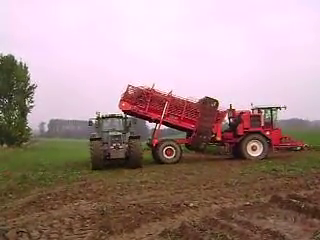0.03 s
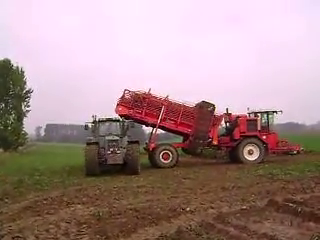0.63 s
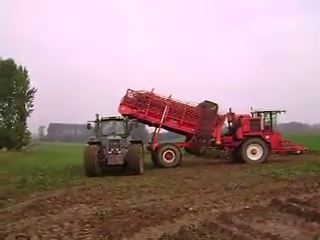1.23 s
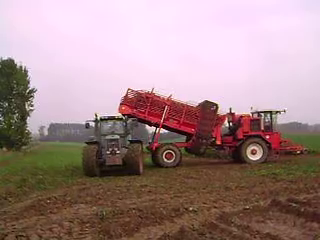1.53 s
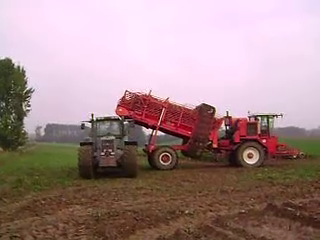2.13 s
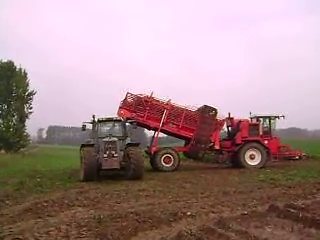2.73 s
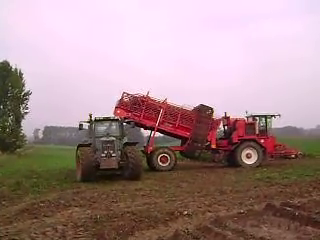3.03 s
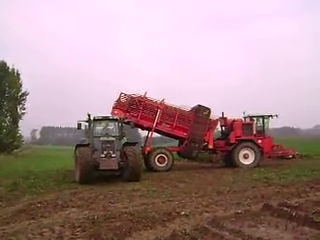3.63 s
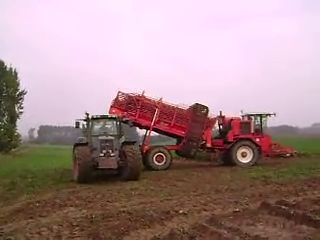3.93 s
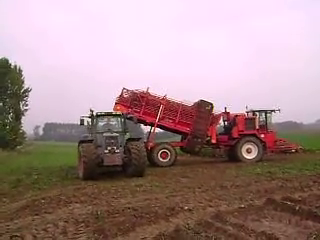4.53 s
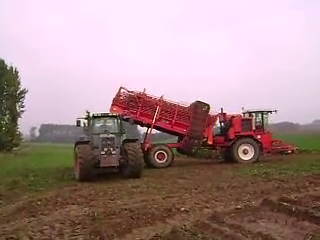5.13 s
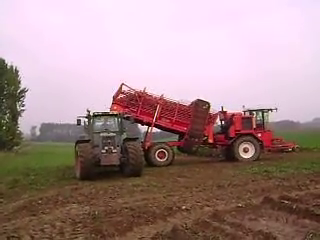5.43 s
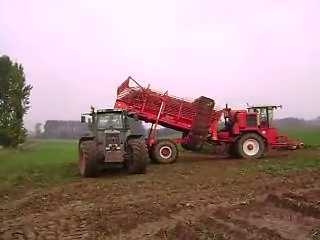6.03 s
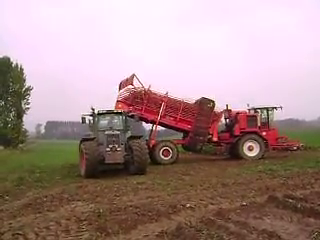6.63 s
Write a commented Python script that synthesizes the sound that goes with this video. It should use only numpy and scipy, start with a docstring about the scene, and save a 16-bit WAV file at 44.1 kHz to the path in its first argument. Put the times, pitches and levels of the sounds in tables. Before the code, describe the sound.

A harvester's diesel engine runs at a steady working speed in an open field, with rapid knocking, rattling panels, ticking valves and whining gears over rushing fan air. Beneath it, a quieter tractor slows to a low idle. Near the end, loud gusts of wind thump the small camera microphone and overload it into a faint, bright crackle.

```python
"""A beet harvester's six-cylinder diesel holds working speed in a field: knocks ring its panels and
rattle loose parts, valves tick and gears whine over a bed of fan air. A tractor pulls up beside it
and drops to idle, and the two exhaust notes beat against each other. Near the end a run of gusts
thumps a small camera's microphone and overloads it into a faint, bright crackle."""
import sys
import numpy as np
from scipy import signal
from scipy.fft import rfft, irfft, next_fast_len
from scipy.io import wavfile
from scipy.ndimage import uniform_filter1d

SR = 44100
rng = np.random.default_rng(int(sys.argv[2]) if len(sys.argv) > 2 else 0)


def master_out(mix):
    """Clip the mix to full scale and print it as 16-bit PCM to the path in sys.argv[1]."""
    frames = np.transpose(np.atleast_2d(mix))
    ceiling = np.clip(frames, -1, 1)
    pcm = np.round(ceiling * 32767).astype(np.int16)
    wavfile.write(sys.argv[1], SR, pcm)


N = 302967

# rush of the cooling fans and running gear: f/Hz, level/dB
FAN_SPECTRUM = [(20, -32), (60, -12), (105, -3), (160, 2), (225, 1), (310, -5), (450, -7.5), (550, -10.5),
                (900, -3), (1400, -4.5), (2500, -19), (6000, -37.5)]
# gusts at the microphone: start t/s, hold t/s, strength level/dB, extra eddy level/dB
GUSTS = [(5.755, 0.014, -10, 5.5), (5.942, 0.36, -4, 6), (6.175, 0.01, -7.5, 6), (6.403, 0.017, -6, 8),
         (6.48, 0.076, -6.5, 2.5), (6.644, 0.019, -5.5, 5.5), (6.767, 0.01, -7.5, 2.5)]
# thump of wind on the camera housing: f/Hz, level/dB
BUFFET_SPECTRUM = [(20, -16.5), (45, -17), (90, -12), (125, -4.5), (150, 1.5), (175, 0.5), (205, -5.5),
                   (250, -3.5), (310, -10.5), (450, -11.5), (560, -23), (1500, -42)]
# eddies in the housing's slots: f/Hz, level/dB
EDDY_SPECTRUM = [(200, -12), (450, -17), (560, -5), (720, 4.5), (1000, 1.5), (1400, -13), (2300, -16.5),
                 (3100, -13.5), (5000, -18.5), (6500, -19.5)]
# the tractor slows to idle and labours briefly as it stops: t/s, firing rate f/Hz
TRACTOR_FIRING = [(0, 54.1), (1.42, 50.6), (1.68, 42.5), (2.3, 39.5), (3.2, 40.4), (3.42, 36.9),
                  (3.7, 39.2), (4.5, 38.6)]
# its exhaust note at idle speed: multiple of the firing rate, rolling level/dB, standing level/dB
TRACTOR_HARMONICS = [(1, -37, -46), (2, -39.5, -38.5)]
# its puffs of exhaust gas: f/Hz, level/dB
PUFF_SPECTRUM = [(60, -22.0), (130, -9.5), (210, 2.5), (320, -1.5), (450, -15.0), (1500, -34.0)]
# the harvester's exhaust note and gear tones: multiple of the cycle rate, level/dB
HARVESTER_TONES = [(6, -30.3), (14, -41), (36, -45), (51, -40), (54, -43), (67, -36), (69, -28.5),
                   (75, -33.5), (102, -45), (132, -42)]
# its valve and injector ticks: f/Hz, level/dB
TICK_SPECTRUM = [(900, -18.5), (1800, -5.5), (2500, 0.5), (3200, 0.5), (4200, 1.5), (5200, 1), (6500, -8)]
# its knocks: place in the two-turn engine cycle (0 to 1), level/dB
KNOCKS = [(0, 0), (.12, -1.5), (.21, 2), (.325, -5), (.43, 0), (.5, -3), (.55, -4), (.68, 0.5), (.78, -4.5),
          (.85, -4.5)]
# ring of its block and panels: f/Hz, level/dB
PANEL_SPECTRUM = [(90, -23), (200, -12), (330, -15.5), (460, -9.5), (550, -16), (700, 2), (900, 0.5),
                  (1120, -3), (1290, -17.5), (1520, -7), (1750, -12), (2080, -11.5), (2500, -21),
                  (5500, -28.5)]
# a faint bright lift near 10 kHz: f/Hz, level/dB
TREBLE_LIFT = [(6000, 0), (7500, 2), (10500, 5), (15000, 0)]


def undb(db):
    """Decibels to gain."""
    return 10 ** (np.asarray(db) / 20)


def level(x, db):
    """Scale to an rms level."""
    return x * undb(db) / np.sqrt(np.mean(x ** 2))


def colour(x, spectrum):
    """EQ a signal with a curve of (f/Hz, level/dB) points."""
    hz, db = np.transpose(spectrum)
    size = next_fast_len(len(x) + SR // 10)
    bins = np.maximum(np.fft.rfftfreq(size, 1 / SR), 1)
    gain = undb(np.interp(np.log(bins), np.log(hz), db))
    return irfft(rfft(x, size) * gain, size)[:len(x)]


def noise(spectrum):
    """Coloured noise of rms 1."""
    return level(colour(rng.standard_normal(N), spectrum), 0)


def wander(rate_hz):
    """Smooth random modulation with a spread near 1."""
    hold = int(SR / rate_hz)
    steps = np.repeat(rng.standard_normal(N // hold + 1), hold)
    return 1.3 * uniform_filter1d(uniform_filter1d(steps, hold), hold)[:N]


def strikes(cycles, place, scatter_db):
    """One hit of uneven strength each time the engine passes a place in its cycle."""
    hits = np.flatnonzero(np.diff(np.floor(cycles - place)) > 0)
    pulses = np.zeros(N)
    pulses[hits] = undb(scatter_db * rng.standard_normal(len(hits)))
    return pulses


def fade(t60):
    """A short exponential tail that falls at 60 dB per t60 seconds."""
    return np.exp(-np.log(1000) * np.arange(SR // 8) / SR / t60)


def ring(pulses, response):
    """Let every pulse trigger a response."""
    return signal.fftconvolve(pulses, response)[:N]


def fans(air_db=-27, blade_hz=230, blade_db=-37):
    """A bed of rushing cooling air with an unsteady blade tone."""
    blade_passes = np.cumsum(blade_hz * (1 + .008 * wander(6.6))) / SR
    air = noise(FAN_SPECTRUM) * undb(air_db + 0.38 * wander(11))
    blade_tone = np.sin(2 * np.pi * blade_passes) * undb(1.2 * wander(8.3))
    return air + level(blade_tone, blade_db)


def gust(start, hold, attack_s=0.037, release_db_per_s=42):
    """Envelope of one gust: it rises fast, holds and dies away."""
    age = np.arange(N) / SR - start
    release = undb(-release_db_per_s * np.maximum(age - attack_s - hold, 0))
    return np.clip(age / attack_s, 0, 1) * release


def wind(eddy_db=-5, eddy_growth=1.59, eddy_lag_s=0.013, flutter_db=0.5):
    """Overlapping gusts thump the housing; brighter eddies trail each thump and swell more steeply."""
    thump_power, eddy_power = 0, 0
    for start, hold, db, extra_db in GUSTS:
        thump_power += (undb(db) * gust(start, hold)) ** 2
        trailing = undb(db) * gust(start + eddy_lag_s, hold)
        eddy_power += (undb(extra_db) * trailing ** eddy_growth) ** 2
    buffet = noise(BUFFET_SPECTRUM) * np.sqrt(thump_power) * undb(flutter_db * wander(50))
    eddies = noise(EDDY_SPECTRUM) * np.sqrt(eddy_power) * undb(eddy_db + 1.54 * wander(160))
    return buffet + eddies


def coasting_dip_db(firing_hz, db_per_hz_per_s=0.46, lag_s=0.2):
    """Fuel is cut while the tractor's revs fall, so its note ducks, with a short lag."""
    slowing = np.maximum(-np.gradient(firing_hz, 1 / SR), 0)
    follow = 1 / (lag_s * SR)
    return db_per_hz_per_s * signal.lfilter([follow], [1, follow - 1], slowing)


def tractor(stop_s=3.6, unload_s=0.35, note_db_per_octave=7, idle_puff_db=-35, puff_db_per_octave=10):
    """A soft exhaust note rides speed and load; each firing adds a puff of gas, stronger above idle."""
    t = np.arange(N) / SR
    firing_hz = np.interp(t, *np.transpose(TRACTOR_FIRING))
    firings = np.cumsum(firing_hz) / SR
    octaves_over_idle = np.log2(firing_hz / firing_hz[-1])
    standing = np.clip((t - stop_s) / unload_s + .5, 0, 1)  # the load comes off as it stops
    effort_db = note_db_per_octave * octaves_over_idle - coasting_dip_db(firing_hz)
    note = 0
    for order, rolling_db, standing_db in TRACTOR_HARMONICS:
        db = effort_db + rolling_db * (1 - standing) + standing_db * standing
        note += undb(db) * np.sqrt(2) * np.cos(2 * np.pi * order * firings)
    puff_envelope = np.exp(-(firings % 1) / 0.44)
    puffs = colour(puff_envelope * rng.standard_normal(N), PUFF_SPECTRUM)
    return note + level(puffs, idle_puff_db) * undb(puff_db_per_octave * octaves_over_idle)


def valves(cycles, shake, count=34, tick_db=-31.5, hiss_db=-43.0):
    """Valves and injectors tick at set places in the cycle, harder after a knock, over a fine hiss."""
    places = (np.arange(count) + rng.random(count)) / count
    contacts = sum(strikes(cycles, place, scatter_db=2.3) for place in places)
    accents = 2 + level(shake, 0)
    ticks = ring(contacts * accents, fade(t60=.006)) * rng.standard_normal(N)
    return level(colour(ticks, TICK_SPECTRUM), tick_db) + undb(hiss_db) * noise(TICK_SPECTRUM)


def exhaust_and_gears(cycles, waver_db=0.66, whine_order=136, whine_start_db=-37.5, rise_db_per_s=1.2):
    """Tones locked to the crankshaft; moving air makes the high ones waver more. The top whine grows."""
    whine_db = whine_start_db + rise_db_per_s * np.arange(N) / SR
    tones = 0
    for order, db in HARVESTER_TONES + [(whine_order, whine_db)]:
        waver = waver_db * min(order / 50, 1) * wander(12)
        tones += undb(db + waver) * np.sqrt(2) * np.cos(2 * np.pi * order * cycles)
    return tones


def harvester(cycle_hz=13.137, ring_t60=0.036, rattle_t60=0.13, ring_db=-24.5, rattle_db=-21.5):
    """Each diesel knock rings the panels the same way every cycle and shakes loose parts into a rattle."""
    cycles = np.cumsum(cycle_hz * (1 + .0004 * wander(6))) / SR
    tail = fade(ring_t60)
    rings, blows = 0, 0
    for place, db in KNOCKS:
        pulses = undb(db) * strikes(cycles, place, scatter_db=0.7)
        rings += ring(pulses, tail * rng.standard_normal(len(tail)))
        blows += pulses
    panels = level(colour(rings, PANEL_SPECTRUM), ring_db)
    shake = ring(blows, fade(rattle_t60))
    rattle = level(colour(shake * rng.standard_normal(N), PANEL_SPECTRUM), rattle_db)
    return panels + rattle + valves(cycles, shake) + exhaust_and_gears(cycles)


def scene():
    """Both machines, the fan bed and the wind, mixed to mono."""
    return (harvester() + tractor() + fans() + wind())[None]


def record(dry, ceiling=0.7, rail=0.69, band_hz=5600, top_hz=15800):
    """The preamp saturates, a low-pass follows, and its overshoots clip into a faint, bright crackle."""
    driven = dry[0] / (1 + (dry[0] / ceiling) ** 8) ** (1 / 8)
    low_pass = signal.firwin(121, band_hz, window=("kaiser", 8), fs=SR)
    dulled = signal.lfilter(low_pass, 1, driven)
    bright = colour(np.clip(dulled, -rail, rail), TREBLE_LIFT)
    top_cut = signal.ellip(8, .2, 70, top_hz, fs=SR, output="sos")
    return signal.sosfilt(top_cut, bright)[None]


dry = scene()
out = record(dry)
master_out(out)
```